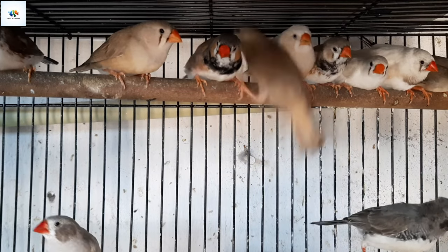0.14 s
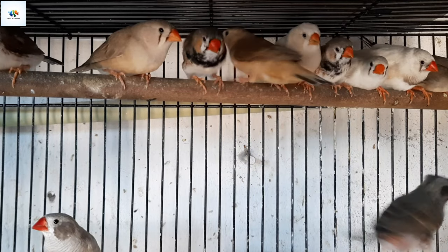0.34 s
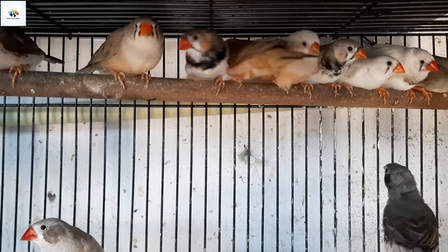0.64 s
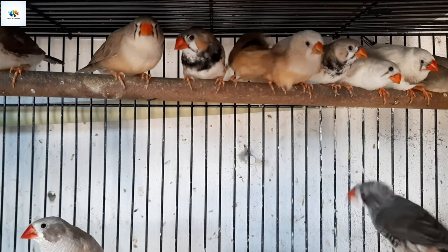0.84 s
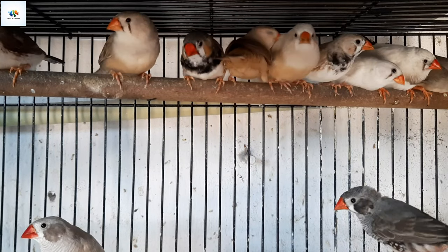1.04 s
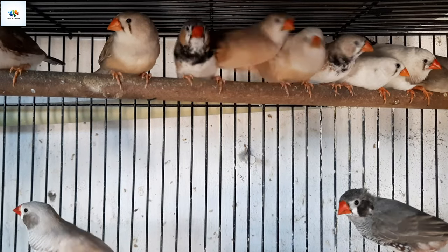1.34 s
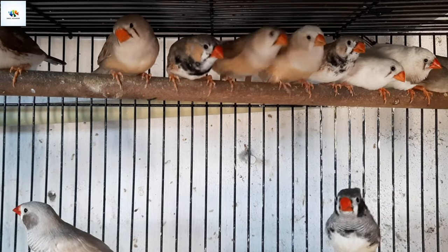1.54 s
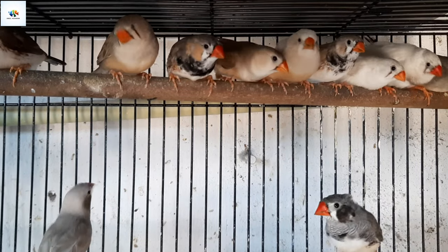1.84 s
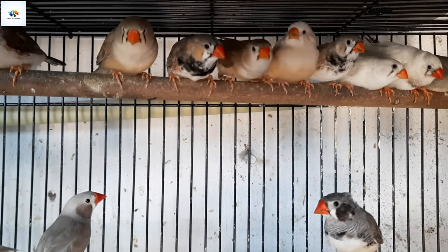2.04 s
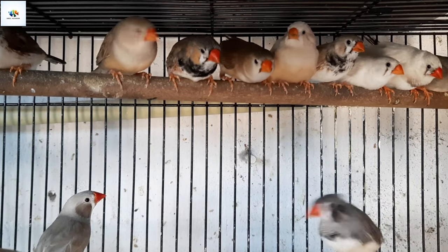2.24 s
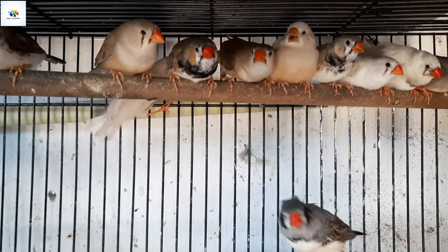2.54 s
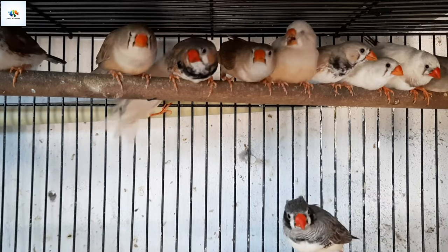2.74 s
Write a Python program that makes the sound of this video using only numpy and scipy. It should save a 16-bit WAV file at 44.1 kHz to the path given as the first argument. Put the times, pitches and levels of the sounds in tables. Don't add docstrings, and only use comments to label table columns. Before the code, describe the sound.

Finches on a cage perch bicker in rapid scratchy squawks, short whistles and buzzy chirps indoors.

```python
import sys
import numpy as np
from scipy import signal
from scipy.fft import rfft, irfft
from scipy.io import wavfile
from scipy.ndimage import uniform_filter1d

SR = 44100
rng = np.random.default_rng(int(sys.argv[2]) if len(sys.argv) > 2 else 0)


def invert_db(x):
    u = np.asarray(x, float) / 20
    return 10 ** u


def inscribe(sig):
    pcm = np.round(np.clip(np.atleast_2d(sig).T, -1, 1) * 32767)
    wavfile.write(sys.argv[1], SR, pcm.astype(np.int16))


N = 125685

# (frequency [Hz], level [dB per Hz])
HUM_SPECTRUM = [(12, -43), (20, -24), (60, -1.5), (108, -0.5), (183, -1.5), (363, -13.5), (476, -3.5),
                (755, -12), (900, -62), (1170, -7.5), (1980, -120)]
# (time [s], level [dB])
HUM_SWELL = [(0, -47.5), (.12, -52), (.25, -58), (.32, -50), (0.499, -52.5), (.8, -48.5), (1.2, -46.5),
             (1.3, -50), (1.58, -44.5), (1.7, -46.5), (2.0, -51.5), (2.3, -50), (2.85, -47.5)]
# (frequency [Hz], likeness [0-1])
HUM_COHERENCE = [(30, .9), (90, .95), (160, .92), (300, .85), (650, .8)]
# (frequency [Hz], width [Hz])
MOTOR_TONES = [(73, 5.3), (111, 10.4), (480, 26)]
# (frequency [Hz], level [dB per Hz])
HAZE_SPECTRUM = [(400, -50), (700, -10), (1000, -2.5), (1600, -9.5), (3500, -11.5), (5000, -2), (6800, -2),
                 (8000, -12.5), (15500, -26), (16000, -90)]
# (start [s], length [s], level [dB], first resonance [Hz], last resonance [Hz])
CHATTERS = [(2, 0.033, -27, 3500, 3300), (2.273, 0.033, -25, 4000, 3600), (2.298, 0.026, -26.5, 3700, 3040),
            (2.1, 0.032, -29.5, 3400, 3700), (2.395, 0.046, -23.5, 3200, 3640),
            (2.427, 0.04, -31.5, 3260, 3200), (1.36, .025, -34.5, 5300, 3800),
            (2.555, .07, -34, 3170, 3000), (1.362, 0.016, -35.5, 3300, 2800), (2.25, .07, -33, 2670, 2600),
            (2.435, 0.041, -34.5, 1660, 1260), (2.722, 0.016, -46, 2600, 2400),
            (2.435, 0.047, -35.5, 4300, 4100), (1.255, .035, -37.5, 3100, 2800),
            (1.5, 0.044, -37, 5200, 5500), (1.478, 0.046, -33, 5000, 5000), (.99, .035, -37, 3900, 3000),
            (2.345, 0.039, -34.5, 2700, 2800), (.05, .3, -48.5, 1130, 1280),
            (2.116, 0.072, -34, 2100, 2640), (0.066, 0.11, -42.5, 2200, 1300),
            (1.5, 0.054, -33, 2400, 2150), (1.421, 0.15, -41.5, 1940, 1500)]
# (start [s], length [s], level [dB], first pitch [Hz], last pitch [Hz])
WHISTLE_CALLS = [(0.747, 0.059, -21.5, 3980, 3200), (0.778, 0.052, -29, 3430, 2000),
                 (.795, .03, -26, 3510, 3800), (.81, 0.03, -25, 4450, 3240),
                 (0.819, 0.045, -23, 3400, 2950), (0.921, 0.048, -24, 4350, 2480),
                 (0.954, 0.028, -34, 2700, 2350), (0.979, 0.019, -33.5, 2790, 3170),
                 (0.99, 0.03, -26, 4450, 2890), (1.023, 0.034, -33.5, 4200, 4830),
                 (1.174, 0.037, -33.5, 2956, 2916), (2.14, 0.024, -28.5, 2770, 2960),
                 (2.192, .052, -24, 3744, 3416), (2.229, 0.033, -23.5, 3550, 2890),
                 (2.247, 0.038, -30.5, 4400, 3660), (2.281, 0.021, -30, 4350, 4390),
                 (2.278, 0.025, -22.5, 3250, 3344), (2.33, 0.042, -28, 2630, 2760),
                 (2.383, 0.022, -20.5, 3414, 3060), (2.401, 0.061, -36, 4900, 3870),
                 (2.459, .018, -36, 5370, 5340), (2.505, 0.019, -28.5, 4500, 4440),
                 (2.525, 0.023, -35, 3300, 3050), (2.537, 0.019, -37, 2600, 2420),
                 (2.545, 0.017, -36, 4640, 4300), (2.559, 0.016, -30.5, 3690, 3580),
                 (2.57, 0.034, -29, 2580, 2644), (2.6, 0.019, -30.5, 2960, 3050),
                 (2.805, .025, -33.5, 2376, 2560), (.074, 0.023, -37.5, 4280, 3670),
                 (.68, 0.086, -28, 3093, 3190), (2.028, 0.037, -26, 3520, 2480),
                 (0.319, 0.084, -34, 3990, 4090), (0.914, 0.046, -25.5, 7160, 6940),
                 (.262, .05, -27, 6540, 6530), (2.01, .035, -21.5, 7070, 7100)]
# (start [s], length [s], level [dB], first pitch [Hz], last pitch [Hz])
MURMUR_CALLS = [(0.202, 0.028, -41, 1650, 1640), (0.279, 0.05, -37.5, 1676, 1690),
                (1.009, 0.025, -39, 1420, 1620), (1.218, 0.05, -33, 1505, 1730),
                (1.26, .035, -34.5, 1847, 1680), (1.332, 0.025, -37, 2276, 2360),
                (1.375, 0.017, -36.5, 2380, 2600), (1.937, 0.018, -32.5, 1757, 1790),
                (1.981, 0.033, -35.5, 1533, 1550), (2.062, 0.04, -34.5, 2050, 2060),
                (2.302, 0.052, -35.5, 1932, 1755), (2.358, 0.02, -35.5, 1865, 1850),
                (2.508, 0.041, -40, 1870, 1710), (2.549, .026, -41.5, 1252, 1650),
                (2.591, 0.018, -41, 1750, 1600), (2.677, .02, -41.5, 1735, 1600),
                (2.707, .018, -43, 1590, 1590), (2.75, 0.028, -46, 1110, 1250)]
# (start [s], length [s], level [dB], beak resonance [Hz], throat share [dB])
SQUAWK_CALLS = [(0.181, 0.073, -24.5, 6020, -12), (0.256, 0.081, -22.5, 6000, -8),
                (0.322, 0.11, -22, 6600, -7.5), (0.395, 0.048, -14, 5750, -15),
                (0.424, 0.067, -21, 4970, -7), (0.492, 0.084, -16.5, 6270, -9),
                (0.54, 0.057, -17, 5340, -13), (0.574, 0.096, -20.5, 5670, -3.5),
                (0.65, 0.11, -15.5, 5955, -6), (0.75, 0.037, -23, 4750, -15),
                (0.828, 0.12, -18.5, 6670, -7), (0.917, 0.036, -20.5, 6240, -34),
                (1.048, 0.14, -16.5, 6140, -9), (1.504, 0.082, -18, 5830, -13.5),
                (1.567, 0.033, -20.5, 6050, -7.5), (1.652, 0.085, -22, 5920, -13.5),
                (1.719, 0.13, -17, 5820, -10.5), (1.838, 0.071, -16.5, 6200, -11.5),
                (1.894, 0.077, -22.5, 6380, -7.5), (1.933, 0.095, -16.5, 5400, -10),
                (2.004, 0.083, -18, 6030, -10), (2.071, 0.064, -22.5, 6160, -5.5)]
STRAND_RATIOS = [.84, .93, 1.02, 1.11]
# (start [s], length [s], level [dB], first pitch [Hz], last pitch [Hz])
PEEP_CALLS = [
    (1.308, 0.02, -27, 2720, 2770),
    (1.395, 0.05, -25.5, 2560, 2973),
    (1.479, 0.038, -26, 2440, 2890),
    (1.568, 0.042, -29, 2554, 2754),
    (1.652, 0.061, -28, 2490, 2726),
    (1.767, 0.04, -26.5, 2590, 2760),
    (1.861, 0.031, -25.5, 2640, 2760),
]
# (frequency [Hz], level [dB])
COVER_LOSS = [(60, -4), (130, -5), (290, -16), (640, -19.5), (1410, -35), (3100, -36.5), (6820, -102),
              (15000, -101)]
# (frequency [Hz], lead [radians])
COVER_PHASE = [(0, 0.5), (430, -1.47), (4130, -4), (7320, -12), (11900, -16.2), (15500, -39.7)]

MOTOR_DB = -9
HAZE_DB, HAZE_PATCH_DB, FAR_DB, FAR_PER_S = -41.5, 2, -46, 45
DUCK_DB, DUCK_HZ = -8, 1400
ROOM_DB, ROOM_T60_S = -8, .12
RISE_S, FALL_S = .019, .018
CHATTER_HZ, CHATTER_WIDTH_HZ = 540, 800
CHATTER_ROUGH, CHATTER_JITTER, CHATTER_SAG = .22, .04, .5
OCTAVE_DB, PEEP_OCTAVE_DB, OCTAVE_TOP_HZ = -16, 5, 10000
BEND, FUZZ, FUZZ_HZ, SIDE_DB, GLIDE_FADE_DB = 1.2, .46, 270, -14, -9
PULSE_HZ, JITTER, HARSH, SURGE_DB = 555.2, .3, .86, 1.2
BEAK_WIDTH_HZ, BEAK_WANDER, BEAK_ARCH = 2000, .025, .076
THROAT_HZ, THROAT_WIDTH_HZ, THROAT_WANDER = 4200, 2160, .04
STRAND_WIDTH_HZ, STRAND_WANDER, STRAND_DB, STRAND_SURGE_DB = 300, .012, -11, 3
EDGE_HZ, EDGE_ORDER, AIR_DB = 7650, 10, -21
SELF_NOISE_DB, TOP_HZ, LIMIT = -86, 15830, .8


def read(points, hz):
    f, value = np.transpose(points)
    return np.interp(np.log(hz + 1), np.log(f + 1), value)


def evened(x):
    return x / np.sqrt(np.mean(x ** 2) + 1e-20)


def add(mix, s, sound):
    part = mix[round(s * SR):][:len(sound)]
    part += sound[:len(part)]


def drift(length, hz):
    span = max(int(SR / hz), 2)
    noise = rng.standard_normal(length)
    return evened(uniform_filter1d(uniform_filter1d(noise, span), span))


def passed(x, hz, kind):
    sos = signal.butter(EDGE_ORDER // np.size(hz), hz, kind, fs=SR, output="sos")
    return signal.sosfilt(sos, x)


def resonate(x, hz, width_hz):
    turn = np.exp(2j * np.pi * np.cumsum(hz * np.ones(len(x))) / SR)
    r = np.exp(-np.pi * width_hz / SR)
    return 2 * (turn * signal.lfilter([(1 - r) ** 2], [1, -2 * r, r * r], x / turn)).real


def shape(length):
    t = np.arange(0, length, 1 / SR)
    rise = t / min(RISE_S, length / 3)
    fall = (length - t) / min(FALL_S, length / 3)
    ramp = np.clip(np.minimum(rise, fall), 0, 1)
    return t / length, np.sin(np.pi / 2 * ramp) ** 2


def buzz(length, hz, jitter, rough):
    turns = np.cumsum(hz * np.exp(jitter * drift(length, 400))) / SR
    pulses = np.diff(np.floor(turns), prepend=0) * invert_db(3 * drift(length, 300))
    puffs = (.35 + np.exp(-(turns % 1) / .35)) * rng.standard_normal(length)
    return (1 - rough) * evened(pulses - pulses.mean()) + rough * evened(puffs)


def wash(spectrum, same, patchy_db, count):
    frames, hz = N // 256 + 5, np.fft.rfftfreq(1024, 1 / SR)
    a, b, c, d, patches = rng.standard_normal((frames, 513, 5)).T
    patches = evened(uniform_filter1d(uniform_filter1d(patches, count, 0), size=5, axis=1))
    like = np.clip(read(same, hz), -1, 1)[:, None]
    right = a + 1j * b
    left = like * right + np.sqrt(1 - like ** 2) * (c + 1j * d)
    inside = (hz >= spectrum[1][0]) * np.minimum(1, (spectrum[-2][0] / (hz + 1)) ** 3)
    level_db = read(spectrum[1:-1], hz)[:, None] + patchy_db * patches
    z = np.array([left, right]) * invert_db(level_db) * inside[:, None]
    return evened(signal.istft(z, nperseg=1024, noverlap=768)[1][:, :N])


def room(x):
    t = np.arange(SR // 4) / SR
    tail = rng.standard_normal((2, len(t))) * invert_db(-60 * t / ROOM_T60_S) * (t > .002)
    return signal.fftconvolve(x[None], tail / np.linalg.norm(tail[0]), axes=1)[:, :N]


def room_hum():
    motor = sum(evened(resonate(rng.standard_normal(N), hz, width)) * 60 / hz
                for hz, width in MOTOR_TONES)
    hum = wash(HUM_SPECTRUM, HUM_COHERENCE, 3.0, count=3) + invert_db(MOTOR_DB) * motor
    swell_db = np.interp(np.arange(N) / SR, *np.transpose(HUM_SWELL))
    return invert_db(3.0 + swell_db) * hum


def far_flock():
    out = np.zeros(N)
    for when, long, loud, pitch, glide in rng.random((round(FAR_PER_S * N / SR), 5)):
        hz = 1200 * 3 ** pitch ** 2
        last_hz = hz * (0.757 + 0.422 * glide)
        add(out, *whistle(when * N / SR, 0.01 + 0.017 * long, FAR_DB + 8 * loud, hz, last_hz, OCTAVE_DB))
    return out


def bird_haze(busy):
    haze = invert_db(HAZE_DB + 7.0) * wash(HAZE_SPECTRUM, [(1, 0), (2, 0)], HAZE_PATCH_DB, count=5)
    haze = haze + room(far_flock()) + [[0], [1]] * far_flock()
    low = invert_db(DUCK_DB * busy) * passed(haze, DUCK_HZ, "lowpass")
    return passed(haze, DUCK_HZ, "highpass") + low


def chatter(start, length, level_db, first_hz, last_hz):
    u, env = shape(length)
    pulse_hz = CHATTER_HZ * (1 + CHATTER_SAG * (u - u * u - u ** 3 / 3))
    drive = buzz(len(u), pulse_hz, CHATTER_JITTER, CHATTER_ROUGH)
    voiced = resonate(drive, first_hz + (last_hz - first_hz) * u, CHATTER_WIDTH_HZ)
    return start, invert_db(level_db) * env * evened(voiced)


def whistle(start, length, level_db, first_hz, last_hz, octave_db):
    u, env = shape(length)
    hz = (first_hz + (last_hz - first_hz) * u ** BEND) * (1 + 0.011 * drift(len(u), 400))
    turn = 2 * np.pi * np.cumsum(hz) / SR
    wander = (drift(len(u), FUZZ_HZ) + 1j * drift(len(u), FUZZ_HZ)) / 2 ** .5
    flutter = (1 - FUZZ) + FUZZ * wander
    flutter = flutter * (1 + 2 * invert_db(SIDE_DB) * np.cos(turn / 6))
    octave = (2 * hz < OCTAVE_TOP_HZ + 2000) * invert_db(octave_db) * np.exp(2j * turn)
    tone = (flutter * (np.exp(1j * turn) + octave)).real
    fade_db = GLIDE_FADE_DB * np.log2(first_hz / np.minimum(hz, first_hz))
    return start, invert_db(level_db + fade_db) * env * evened(tone)


def squawk(start, length, level_db, beak_hz, throat_db):
    u, env = shape(length)
    drive = buzz(len(u), PULSE_HZ, JITTER, HARSH)
    beak_hz = beak_hz * (1 + BEAK_ARCH * (np.sin(np.pi * u ** 1.67) - .5))
    beak = evened(resonate(drive, beak_hz * (1 + BEAK_WANDER * drift(len(u), 73)), BEAK_WIDTH_HZ))
    strands = 0
    for hz, db in [(beak_hz, 0), (THROAT_HZ, throat_db)]:
        for ratio in STRAND_RATIOS:
            flare = invert_db(STRAND_DB + db + STRAND_SURGE_DB * drift(len(u), 42))
            strand_hz = hz * ratio * (1 + STRAND_WANDER * drift(len(u), 65))
            strands = strands + flare * evened(resonate(drive, strand_hz, STRAND_WIDTH_HZ))
    throat = resonate(drive, THROAT_HZ * (1 + THROAT_WANDER * drift(len(u), 35)), THROAT_WIDTH_HZ)
    body = beak + strands + env * invert_db(throat_db) * evened(throat)
    body = passed(body, [1500, EDGE_HZ], "bandpass")
    air = passed(resonate(drive, 7600, 10300), EDGE_HZ, "highpass")
    surge = invert_db(level_db + SURGE_DB * drift(len(u), 27))
    return start, surge * env * (evened(body) + env * invert_db(AIR_DB) * evened(air))


def scene():
    birds = np.zeros(N)
    for row in CHATTERS:
        add(birds, *chatter(*row))
    for row in WHISTLE_CALLS + MURMUR_CALLS:
        add(birds, *whistle(*row, OCTAVE_DB))
    for row in SQUAWK_CALLS:
        add(birds, *squawk(*row))
    for row in PEEP_CALLS:
        add(birds, *whistle(*row, PEEP_OCTAVE_DB))
    power = uniform_filter1d(passed(birds, 4500, "lowpass") ** 2, 3000)
    busy = np.tanh(np.sqrt(abs(power)) / .015)
    wet = room(birds)
    near = np.array([wet[0], birds + invert_db(ROOM_DB) * wet[1]])
    return near + room_hum() + bird_haze(busy)


def low_pass(x):
    return signal.sosfilt(signal.butter(12, 15970, fs=SR, output="sos"), x)


def record(dry):
    hz = np.fft.rfftfreq(N, 1 / SR)
    x = dry + invert_db(SELF_NOISE_DB) * rng.standard_normal((2, N)) / [[.02], [1]]
    gain = invert_db([read(COVER_LOSS, hz), 0 * hz])
    phase = np.exp(1j * np.array([read(COVER_PHASE, hz), 0 * hz]))
    x = irfft(rfft(x) * gain * phase * (hz < TOP_HZ), N)
    return low_pass(LIMIT * np.tanh(x / LIMIT))


dry = scene()
out = record(dry)
inscribe(out)
```